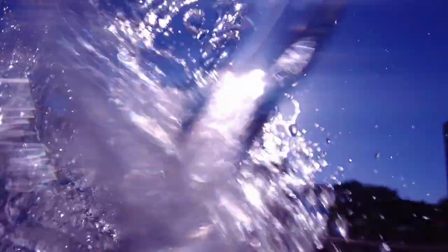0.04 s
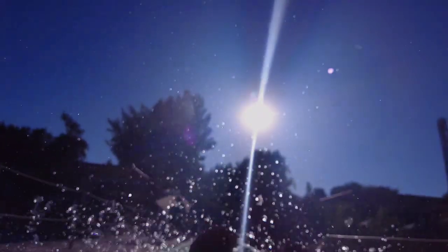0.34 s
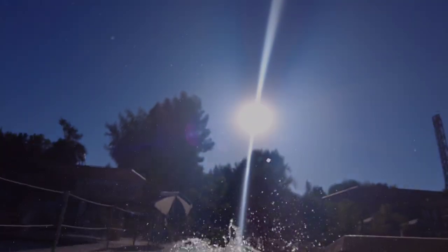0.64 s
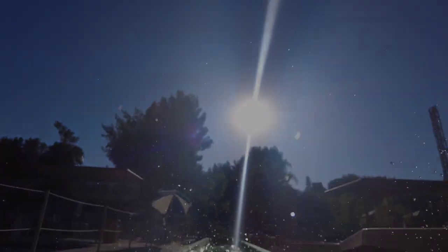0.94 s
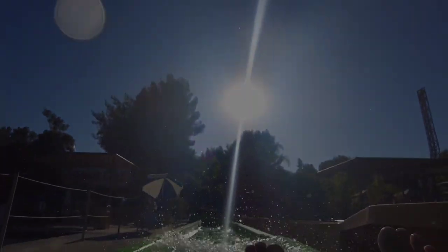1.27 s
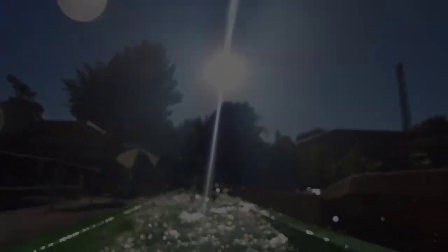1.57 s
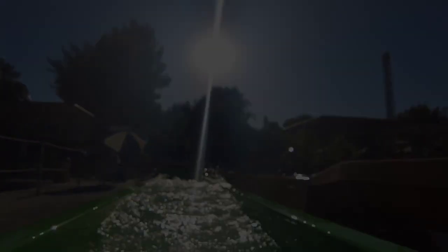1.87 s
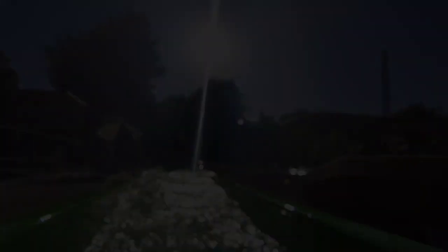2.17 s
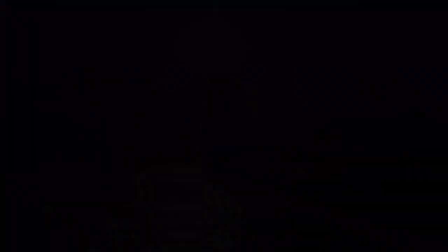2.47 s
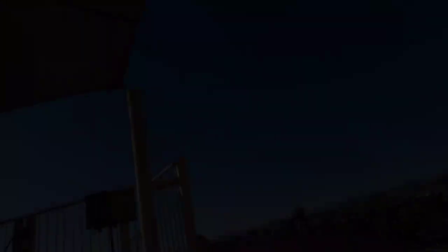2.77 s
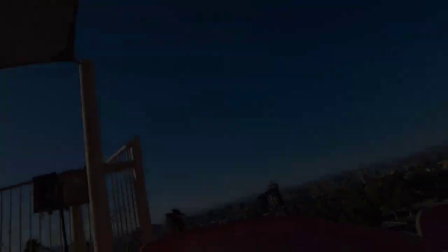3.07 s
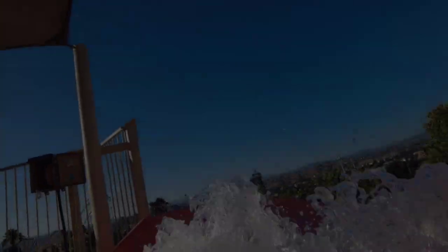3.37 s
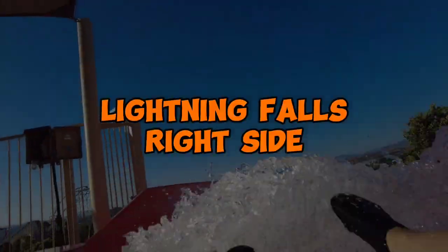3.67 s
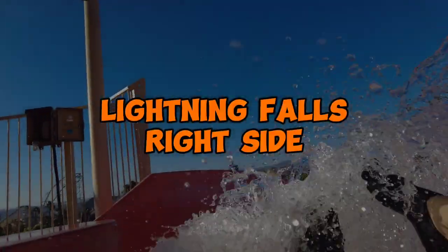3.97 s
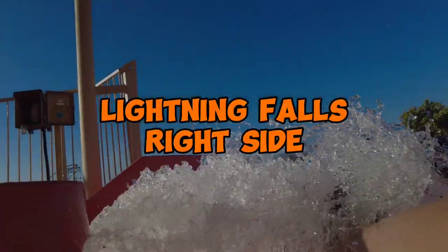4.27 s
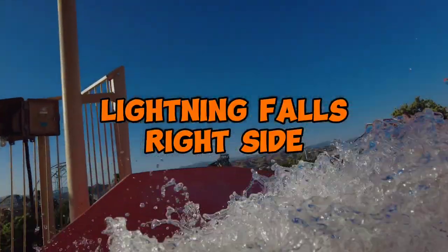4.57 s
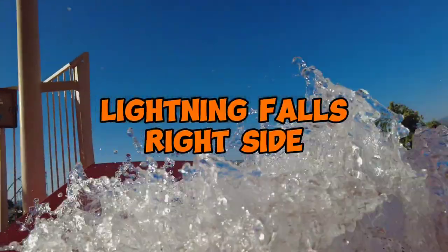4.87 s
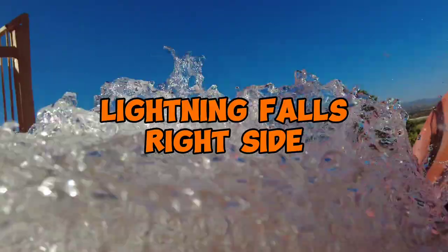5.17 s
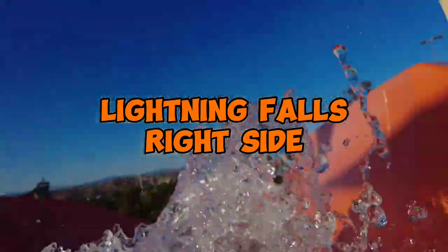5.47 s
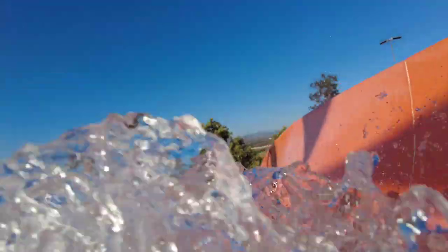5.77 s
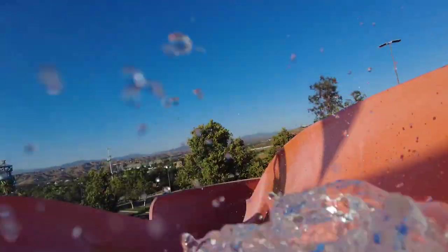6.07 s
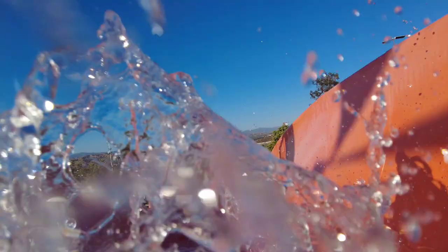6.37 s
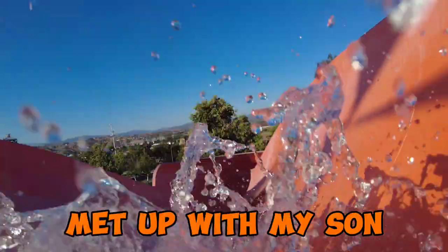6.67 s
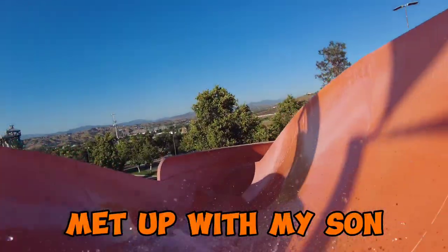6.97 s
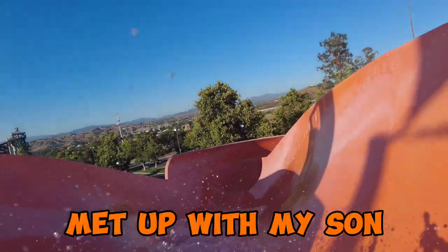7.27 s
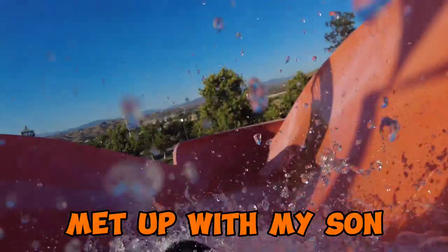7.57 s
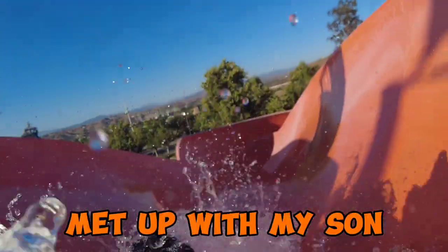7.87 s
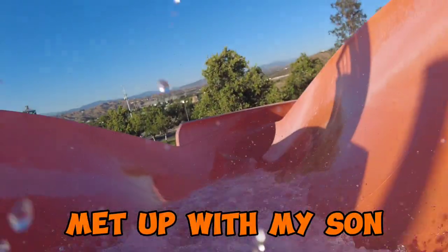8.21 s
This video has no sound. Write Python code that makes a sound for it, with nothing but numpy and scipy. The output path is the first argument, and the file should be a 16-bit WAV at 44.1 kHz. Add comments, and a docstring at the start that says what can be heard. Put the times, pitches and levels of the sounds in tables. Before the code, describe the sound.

A brief splash hits the microphone, then water hisses along an open water slide and thins out over low wind rumble. After a dull bump and an instant's dip, a fuller, fizzing rush begins. In the last part, sheets of spray and single drops slap close by in quick bursts. Everything sounds slightly hollow, heard through a wet waterproof camera case.

```python
"""Down two water slides in a waterproof case

Bubbles hiss along an open flume, thinning out on the first slide and running deep on the second.
Wind and bumps rumble below. Sheets of spray and single drops slap the case, most of them near the end.
All the water is heard through two microphone ports in the case, whose resonances shift as it drains."""
import sys
import numpy as np
from scipy import signal
from scipy.fft import rfft, irfft
from scipy.io import wavfile
from scipy.ndimage import uniform_filter1d

SR = 44100
rng = np.random.default_rng(int(sys.argv[2]) if len(sys.argv) > 2 else 0)


def wav_record(signal):
    """Record a signal, one row per channel, as 16-bit PCM in the file named by sys.argv[1]."""
    frames = np.transpose(np.atleast_2d(signal))
    bounded = np.clip(frames, -1, 1)
    # unit amplitude maps onto the largest positive 16-bit level
    quanta = np.round(bounded * 32767).astype(np.int16)
    wavfile.write(sys.argv[1], SR, quanta)


N = 363384
SECOND_SLIDE_S = 2.557


def gain_of(db):
    """Decibels to amplitude."""
    return 10 ** (np.asarray(db) / 20)


def unit_rms(x):
    """Scales to rms 1."""
    return x / np.sqrt(np.mean(x ** 2) + 1e-20)


def slow_noise(length, span):
    """Noise averaged over span points, at rms 1."""
    return unit_rms(uniform_filter1d(rng.standard_normal(length), span))


def bell(t, centre_s, half_width_s):
    """A smooth rise and fall."""
    return np.exp(-((t - centre_s) / half_width_s) ** 2)


def curve_at(points, hz):
    """Interpolates on a log-frequency axis."""
    points_hz, values = np.transpose(points)
    return np.interp(np.log(hz + 1), np.log(points_hz), values)


def peaks_db(modes, hz):
    """The summed curve of a set of resonances."""
    return sum(db / (1 + (2 * (hz - centre_hz) / width_hz) ** 2) for centre_hz, width_hz, db in modes)


def add(mix, start_s, sound):
    """Mixes a sound in."""
    part = mix[max(round(start_s * SR), 0):][:len(sound)]
    part += sound[:len(part)]


# Resonances of the case and of its booming wall. Each row: centre in Hz, width in Hz, height in dB.
CASE_MODES = [(551, 114, 10), (1138, 154, 13), (3303, 173, 12.5), (3650, 610, -13.5), (4223, 180, 9.5),
              (5887, 1580, 8.5), (7740, 1160, 6.5), (9270, 430, 7)]
WALL_MODES = [(166.7, 19, 11.5), (304, 63, 7)]


def case_response(spectrum, taps=4096):
    """The case rings after a blow of the given spectrum: minimum phase, unit energy."""
    hz = np.fft.rfftfreq(2 * taps, 1 / SR)
    colour_db = curve_at(spectrum, hz) + peaks_db(CASE_MODES + WALL_MODES, hz)
    cepstrum = irfft(colour_db * np.log(10) / 20)
    cepstrum[1:taps] *= 2
    cepstrum[taps:] = 0
    response = irfft(np.exp(rfft(cepstrum)))[:taps]
    return response / np.linalg.norm(response)


# Lag of the far port behind the near one. Each row: frequency in Hz, phase in radians.
PORT_LAG_RAD = [(100, 0.061), (330, 0.49), (560, 1.7), (900, 1.49), (1450, 2.81), (1950, 0.82), (2800, 1.2),
                (3300, 1.17), (3750, 1.92), (4200, 1.8), (4800, 2.06), (5600, 0.26), (6800, 2.54),
                (7800, 0.9), (9500, 1.75), (10900, 1.7), (12500, 1.6)]


def ports(sides, far_db=-4.5):
    """Sound from either side reaches the near port first and the far port later and weaker."""
    half_turn = np.exp(.5j * curve_at(PORT_LAG_RAD, np.fft.rfftfreq(N, 1 / SR)))
    near = rfft(sides)
    return irfft(near * half_turn + gain_of(far_db) * near[::-1] / half_turn, N)


# Turbulence. Each row: frequency in Hz, relative density in dB.
WIND_SPECTRUM = [(8, 1), (22, 1), (38, -2.5), (60, -10), (100, -20), (200, -25), (400, -40), (900, -55.5),
                 (3000, -70)]
# Each row: centre in seconds, relative peak in dB, half width in seconds.
WIND_GUSTS = [(.07, -36.5, 0.21), (.47, -43, 0.28), (1.3, -59, 0.63), (2.0, -47.5, .12), (2.34, -31, 0.055),
              (2.48, -39, 0.1), (2.8, -45, 0.14), (3.298, -41.5, 0.096), (4.671, -31, 0.032),
              (4.95, -46, 0.085), (7.4, -44, 0.41)]


def wind(gain_db=3.0, breeze_db=-53, apart_db=-18, shove_db=-37):
    """Low turbulence shakes the case, nearly alike at both ports; gusts and landing water add to it."""
    colour = gain_of(curve_at(WIND_SPECTRUM, np.fft.rfftfreq(N, 1 / SR)))
    common, apart = unit_rms(irfft(rfft(rng.standard_normal((2, N))) * colour, N))
    common /= np.sqrt(uniform_filter1d(common ** 2, size=6000))
    t = np.arange(0, N + 256, 256) / SR
    shoves = [(start + 0.075 * length, shove_db, 0.67 * length) for start, length, _, _ in SHEETS]
    gust_power = sum((gain_of(db) * bell(t, s, width)) ** 2 for s, db, width in WIND_GUSTS + shoves)
    strength = np.interp(np.arange(N) / SR, t, np.sqrt(gain_of(breeze_db) ** 2 + gust_power))
    return gain_of(gain_db) * strength * (common + gain_of(apart_db) * np.array([apart, -apart]))


# Bumps of the ride, then pushes of landing water from 5.9 s on. Each row: centre in seconds, push peak in dB,
# push half width in seconds, knock level in dB.
CASE_PUSHES = [(0.094, -19.5, 0.0013, -40.5), (.133, -28, 0.0013, -59), (.172, -29, 0.0018, -50),
               (2.062, -32, 0.0075, -70), (2.312, -14, 0.012, -57), (2.335, -20, .003, -46),
               (2.4, -39, 0.0019, -48), (2.789, -30.5, 0.0027, -49.5), (4.673, -17, 0.0036, -37.5),
               (5.985, -25, 0.0057, -62), (6.234, -23.5, 0.0041, -57), (6.709, -23.5, 0.0043, -60),
               (7.627, -24, 0.0027, -51)]


def bumps(knock_hz=545, knock_s=0.0055, rattle_db=-3):
    """A bump or a push of landing water squeezes the case once and leaves a short, dull knock."""
    out, t = np.zeros(N), np.arange(-SR // 20, SR // 10) / SR
    dull = signal.butter(4, 500, fs=SR, output="sos")
    for centre_s, push_db, push_s, knock_db in CASE_PUSHES:
        push = (1 - (t / push_s) ** 2) * np.exp(-.5 * (t / push_s) ** 2)
        rattle = gain_of(rattle_db) * unit_rms(signal.sosfilt(dull, rng.standard_normal(len(t))))
        knock = np.exp(-abs(t) / knock_s) * (np.sin(2 * np.pi * knock_hz * t) + rattle)
        add(out, centre_s + t[0], gain_of(push_db) * push + gain_of(knock_db) * knock)
    return out


def backwash(level_db=-51, fade_db_per_s=14, band_hz=(200, 650), lumpy_db=3):
    """Water churned up at the start sloshes under the case and settles."""
    band = signal.butter(2, band_hz, "bandpass", fs=SR, output="sos")
    lumps = gain_of(lumpy_db * slow_noise(N, 1500))
    churn = unit_rms(signal.sosfilt(band, rng.standard_normal((2, N)) * lumps))
    return churn * gain_of(level_db - fade_db_per_s * np.arange(N) / SR)


def squeak(case, start_s=7.235, length_s=.085, from_hz=400, to_hz=458, level_db=-41):
    """Something wet rubs on the flume: a short run of quickening slips."""
    out, hz = np.zeros((2, N)), np.linspace(from_hz, to_hz, round(length_s * SR))
    turns = np.cumsum(hz) / SR
    slips = sum(np.cos(2 * np.pi * k * turns) / k for k in range(2, 11))
    rub = unit_rms(signal.fftconvolve(slips, case)[:len(hz)])
    add(out[1], start_s, gain_of(level_db) * rub * signal.windows.tukey(len(hz), .7))
    return out


def patter(per_s, spread_db):
    """Clicks of uneven size, one train for each side."""
    sizes = gain_of(spread_db * np.minimum(rng.exponential(1, (2, N)), 4))
    return unit_rms(sizes * rng.choice([-1, 1], (2, N)) * (rng.random((2, N)) < per_s / SR))


# Each row: start and end in seconds, first pitch in Hz, rise in Hz per second, height in dB, width in Hz.
WATER_FILMS = [(.18, 1.725, 1850, 1330, 11, 600), (2.78, 3.2, 2190, 160, 18, 240),
               (5.9, 6.9, 2210, 150, 14, 450), (6.76, 7.22, 2180, 5370, 10.5, 600),
               (7.48, 8.4, 1790, 40, 8, 300)]


def films_db(hz, t, drained_hz=3400, fade_s=0.12):
    """A film of water forms on the case, resonates higher as it drains, and breaks."""
    colour_db = 0
    for start_s, end_s, first_hz, rise_hz_per_s, height_db, width_hz in WATER_FILMS:
        presence = np.clip(np.minimum(t - start_s, end_s - t) / fade_s, 0, 1)
        centre_hz = np.minimum(first_hz + rise_hz_per_s * np.maximum(t - start_s, 0), drained_hz)
        colour_db += peaks_db([(centre_hz, width_hz, height_db * presence)], hz)
    return colour_db


# Hiss of thin and deep flow. Each row: frequency in Hz, relative density in dB.
THIN_SPECTRUM = [(150.0, -14.5), (300.0, -10.5), (800.0, -26.5), (1500.0, -11.5), (2200.0, -14.5),
                 (3000.0, -1.5), (5000.0, -8.5), (6300.0, -16.5), (8000.0, -26), (10500.0, -31.5),
                 (15700.0, -30)]
DEEP_SPECTRUM = [(150.0, -13.5), (300.0, -11.5), (800.0, -17), (1500.0, -19), (2200.0, -9.5), (3000.0, 2),
                 (5000.0, 2.5), (6300.0, -2), (8000.0, -9.5), (10500.0, -12), (15700.0, -13)]
# Resonances a soaked case gains or loses. Each row: centre in Hz, width in Hz, change in dB.
SOAKED_MODES = [(1200, 67, 0), (1340, 740, -6), (1757, 300, 6.5), (4190, 1260, -8)]
# Each row: time in seconds, flow depth from 0 to 1, case wetness from 0 to 1.
WATER_STATE = [(.2, 1, 0.8), (.55, 0.53, 0.27), (1.15, 0.03, 1), (1.45, 0, .5), (1.8, 0.32, 0),
               (2.5, 0.18, 0), (2.6, 0.85, 0.44), (3.9, .45, 0), (4.4, 0.64, 0.18), (5.1, 0.9, .85),
               (5.6, 0.49, 0.85), (6.5, 0.52, 0.85), (6.95, 0.26, 1), (8.24, 0.3, 1)]
# Swells and lulls. Each row: centre in seconds, change in dB, half width in seconds.
FLOW_SWELLS = [(.53, 3.5, 0.083), (1.36, 4, 0.2), (3.05, 2, 0.27), (3.8, -1.5, 0.3), (5.82, -8, 0.009),
               (6.462, 6.5, 0.066), (6.95, 2.5, 0.14)]


def flume_hiss(first_db=-37.33, thinning_db_per_s=9, second_db=-41.33, patchy_db=2.1, flicker_db=1.29):
    """Countless bubbles burst in the flume, heard through the wet case; deep water fizzes more."""
    hz, t, fizz = signal.stft(patter(per_s=11000, spread_db=3.0), SR, nperseg=512, noverlap=384)
    flow_db = np.where(t < SECOND_SLIDE_S, first_db - thinning_db_per_s * t, second_db)
    flow_db += sum(db * bell(t, s, width) for s, db, width in FLOW_SWELLS)
    state_s, depths, wetnesses = np.transpose(WATER_STATE)
    depth, wetness = np.interp(t, state_s, depths), np.interp(t, state_s, wetnesses)
    bin_hz = hz[:, None]
    water_db = depth * curve_at(DEEP_SPECTRUM, bin_hz) + (1 - depth) * curve_at(THIN_SPECTRUM, bin_hz)
    case_db = peaks_db(CASE_MODES, bin_hz) + wetness * peaks_db(SOAKED_MODES, bin_hz)
    colour = gain_of(water_db + case_db + films_db(bin_hz, t))
    hiss_band = (hz > 2000) & (hz < 9000)
    colour /= np.sqrt((colour[hiss_band] ** 2).sum(0) / len(hz))
    patches = uniform_filter1d(rng.standard_normal(fizz.shape), size=7, axis=1)
    patches = unit_rms(uniform_filter1d(patches, size=16, axis=2))
    level_db = flow_db + patchy_db * patches + flicker_db * slow_noise(len(t), 8)
    return signal.istft(fizz * colour * gain_of(level_db), nperseg=512, noverlap=384)[1][:, :N]


def bubbles(low_hz=2300, high_hz=6800, pitches=24, per_pitch_per_s=24, cycles=9, glide=3.4, tries=400):
    """Small air pockets close at random and ring for a few cycles, rising in pitch."""
    out, t = np.zeros((2, N)), np.arange(SR // 30) / SR
    for hz in np.geomspace(low_hz, high_hz, pitches):
        age = hz * t / cycles
        ring = (1 - np.exp(-4 * age)) * np.exp(-age) * np.sin(2 * np.pi * hz * t * (1 + glide * t))
        for when, side, size, chance in rng.random((tries, 4)):
            if chance < per_pitch_per_s * N / SR / tries:
                add(out[round(side)], when * N / SR, size ** 2 * ring)
    return unit_rms(out)


# Landing water. Each row: start and length in seconds, relative spray level in dB, slap level in dB.
SHEETS = [(0.062, 0.049, -35, -49), (.12, 0.092, -48, -55), (2.305, 0.063, -50, -58),
          (5.741, .036, -27, -43), (5.989, 0.09, -22.5, -38), (6.25, 0.1, -27.5, -49),
          (6.55, 0.084, -20, -29.5), (6.638, 0.042, -21.5, -51), (6.69, 0.046, -19.5, -59),
          (7.318, .028, -19.5, -21.5), (7.359, .075, -18, -40), (7.434, 0.11, -21.5, -36),
          (7.695, .072, -16.5, -33), (7.768, 0.074, -31, -62), (7.955, 0.053, -48, -40),
          (8.014, 0.06, -27, -59), (8.064, 0.031, -19, -34.5), (8.103, 0.12, -28, -53)]
SHEET_FADE_DB = -6


def spray(case, hail_db=-4.5, edge_s=0.0037, clump_db=4.0, bubbles_db=-7):
    """A sheet of spray is a dense, clumpy hail of droplets on the case, with bubbles ringing in it."""
    force = np.zeros(N)
    for start_s, length_s, spray_db, _ in SHEETS:
        add(force, start_s, gain_of(spray_db + np.linspace(0, SHEET_FADE_DB, round(length_s * SR))))
    force = uniform_filter1d(force, round(edge_s * SR))
    clumps = gain_of(clump_db * slow_noise(N, 260))
    hail = unit_rms(patter(per_s=3000, spread_db=5) * clumps)
    spatter = signal.oaconvolve(hail * force, case[None], axes=1)[:, :N]
    return gain_of(hail_db) * spatter + gain_of(bubbles_db) * force * bubbles()


# Each row: frequency in Hz, relative density in dB.
SLAP_SPECTRUM = [(40, -32), (90, 3), (300, 1), (600, -5), (1200, -0.5), (2000, -15.5), (5000, -47)]


def slaps(rise_s=0.002, decay_s=0.027):
    """The solid front of each sheet gives the case a dull, hollow blow."""
    out, t = np.zeros((2, N)), np.arange(SR // 5) / SR
    hollow = case_response(SLAP_SPECTRUM)
    for start_s, _, _, slap_db in SHEETS:
        churn = rng.standard_normal(len(t)) * (1 - np.exp(-t / rise_s)) * np.exp(-t / decay_s)
        add(out[rng.integers(2)], start_s, gain_of(slap_db) * signal.fftconvolve(churn, hollow))
    return out


def stray_drops(offset_db=-3, spread_db=4, low_hz=3100, high_hz=5700, scatter=0.094, cycles=12, count=3):
    """Every sheet sheds a few more drops, low or high in pitch: rows like LARGE_DROPS."""
    rows = []
    for start_s, length_s, spray_db, _ in SHEETS:
        for k, (when, size, kind, detune) in enumerate(rng.random((count, 4))):
            age = (k + when) / count
            db = spray_db + SHEET_FADE_DB * age + offset_db + spread_db * (2 * size - 1)
            hz = (low_hz if kind < .5 else high_hz) * (1 + scatter * (2 * detune - 1))
            rows.append((start_s + age * length_s, db, hz, cycles / hz))
    return rows


# Each row: start in seconds, relative level in dB, bubble pitch in Hz, base decay time in seconds.
LARGE_DROPS = [(0.0545, -13.5, 4510, 0.0043), (.105, -27, 5530, .001), (0.1228, -18, 5180, 0.00093),
               (0.159, -24, 5800, 0.00062), (2.315, -46.5, 5370, .002), (2.385, -47, 3400, 0.0022),
               (5.2963, -38, 6100, .0005), (5.745, -13.5, 3080, 0.0017), (5.7938, -15, 5450, 0.0015),
               (5.9943, -17, 6170, 0.0092), (6.0025, -14, 6600, .0038), (6.0266, -22, 6100, .0028),
               (6.0785, -21, 5880, 0.0026), (6.2145, -20, 6080, 0.0014), (6.2558, -21.5, 5740, 0.00081),
               (6.266, -13, 5770, 0.0014), (6.2875, -16.5, 3200, .0048), (6.389, -26, 5750, .0025),
               (6.4567, -26, 5940, .0011), (6.5534, -9, 3320, .0043), (6.592, -12.5, 2990, .0068),
               (6.6402, -22, 2480, 0.0012), (6.6595, -20.5, 3100, 0.0035), (6.6942, -10.5, 5140, 0.0034),
               (6.705, -15, 6200, 0.0018), (6.756, -25.5, 5000, 0.0049), (6.785, -23, 4770, 0.0035),
               (7.326, -12.5, 6100, 0.0077), (7.3518, -8.5, 6500, 0.0016), (7.3783, -9.5, 5760, 0.001),
               (7.3949, -14, 2950, 0.015), (7.4772, -18.5, 5810, 0.0019), (7.491, -17.5, 2900, 0.018),
               (7.577, -26, 5200, 0.0011), (7.6567, -16, 5760, 0.00083), (7.7111, -10, 5810, .0055),
               (7.7283, -11.5, 5460, 0.0046), (7.736, -16, 3160, 0.01), (7.756, -15, 3370, 0.0048),
               (7.7918, -18.5, 4570, 0.0014), (7.807, -23.5, 5860, 0.0013), (7.847, -24.5, 6120, 0.0012),
               (7.9526, -21, 6370, .0023), (7.965, -15.5, 6430, 0.0033), (8.0129, -17, 5840, 0.0018),
               (8.024, -19, 5920, .0015), (8.036, -14.5, 5500, 0.003), (8.0721, -12, 2950, 0.0083),
               (8.1075, -13, 5450, 0.002), (8.135, -13.5, 6500, 0.004), (8.156, -15.5, 6560, 0.0035),
               (8.1928, -15, 5200, 0.0014), (8.2237, -14.5, 3090, .0014)]


def drops(case, gain_db=1, rise_s=.0007, bubble_db=-3.0, bubble_life=0.52, glide=4,
          splat_life=0.99, mist_db=-24, mist_s=0.013, crater_width_hz=1100):
    """Each drop splats on the case, rings the air it traps as a rising bubble and scatters into mist."""
    out, t = np.zeros((2, N)), np.arange(SR // 8) / SR
    onset = 1 - np.exp(-(t / rise_s) ** 2)
    for start_s, db, hz, decay_s in LARGE_DROPS + stray_drops():
        burst = onset * (np.exp(-t / (splat_life * decay_s)) + gain_of(mist_db) * np.exp(-t / mist_s))
        splat = signal.fftconvolve(burst * rng.standard_normal(len(t)), case)[:len(t)]
        # the open crater already favours the pitch of the bubble it closes into
        crater = signal.lfilter(*signal.iirpeak(hz, hz / crater_width_hz, SR), splat)
        bubble = onset * np.exp(-t / (bubble_life * decay_s)) * np.sin(2 * np.pi * hz * t * (1 + glide * t))
        drop = unit_rms(0.4 * splat + crater) + gain_of(bubble_db) * unit_rms(bubble)
        drop *= np.sqrt(.005 * SR) / np.linalg.norm(drop)  # energy of 5 ms at rms 1
        add(out[rng.integers(2)], start_s - rise_s / 2, gain_of(db + gain_db) * drop)
    return out


# A droplet's blow on the case. Each row: frequency in Hz, relative density in dB.
DROPLET_SPECTRUM = [(150.0, 1), (300.0, -17), (800.0, -23), (1500.0, -15), (2200.0, -6), (3000.0, -2.9),
                    (5000.0, -3), (6300.0, -9), (8000.0, -9.5), (10500.0, -14.5), (15700.0, -14)]


def scene():
    """Water from both sides, over wind and bumps."""
    case = case_response(DROPLET_SPECTRUM)
    water = flume_hiss() + spray(case) + drops(case) + slaps() + squeak(case) + backwash()
    return ports(water) + wind() + bumps()


def record(dry, dip_s=0.011, cutoff_hz=15950):
    """The sound dips out for an instant between the slides; soft overload, then a low-pass."""
    dip = 1 - np.exp(-((np.arange(N) / SR - SECOND_SLIDE_S) / dip_s) ** 4)
    low_pass = signal.firwin(511, cutoff_hz, window=("kaiser", 9), fs=SR)
    return signal.oaconvolve(np.tanh(dry * dip), low_pass[None], "same", axes=1)


dry = scene()
out = record(dry)
wav_record(out)
```